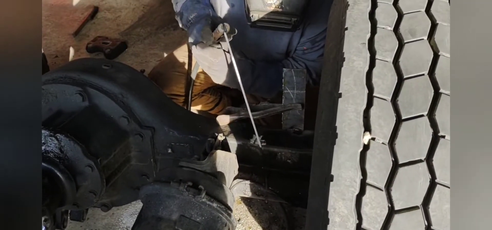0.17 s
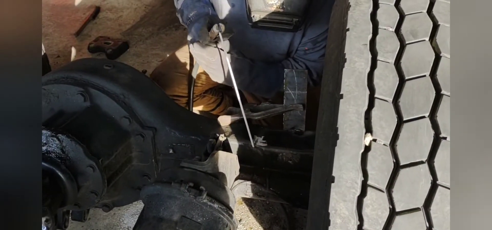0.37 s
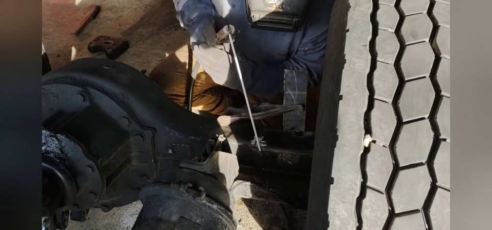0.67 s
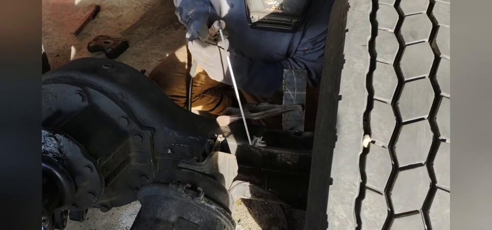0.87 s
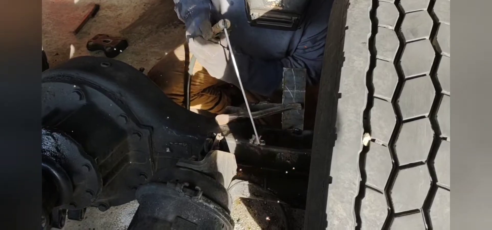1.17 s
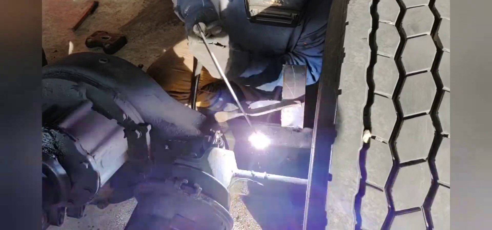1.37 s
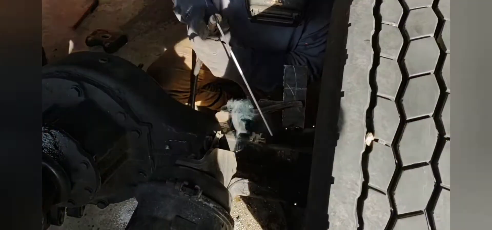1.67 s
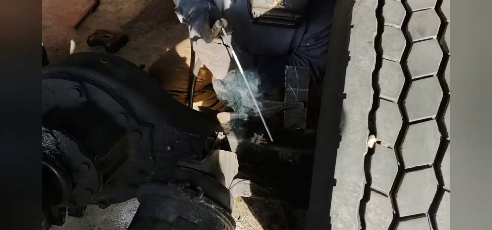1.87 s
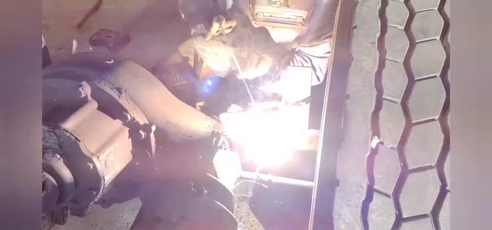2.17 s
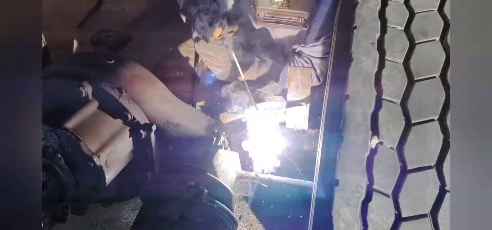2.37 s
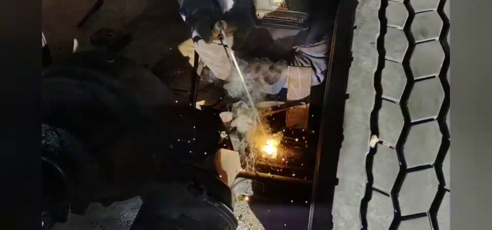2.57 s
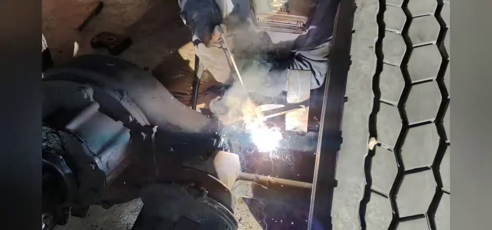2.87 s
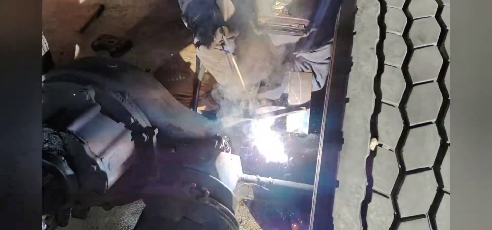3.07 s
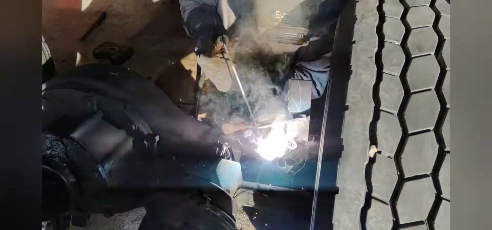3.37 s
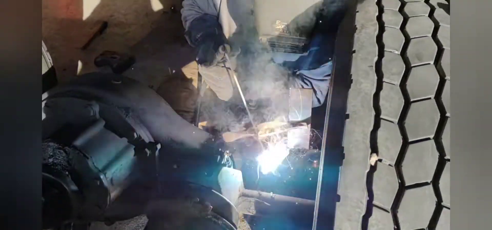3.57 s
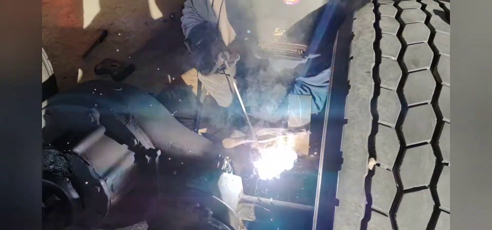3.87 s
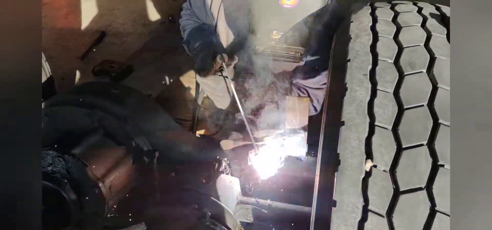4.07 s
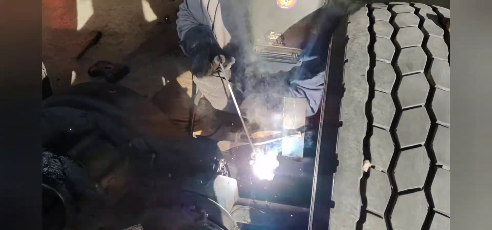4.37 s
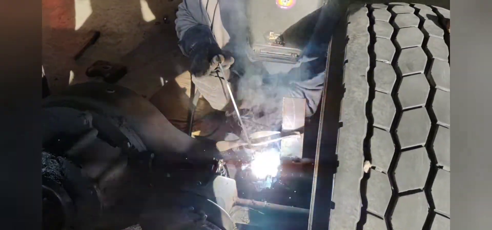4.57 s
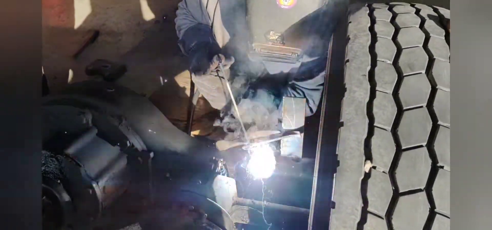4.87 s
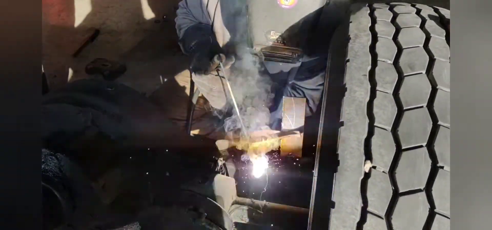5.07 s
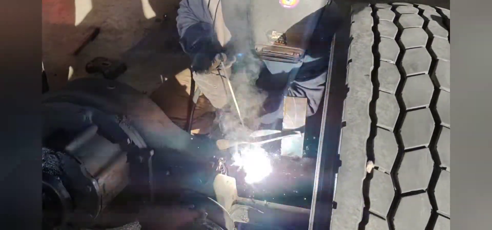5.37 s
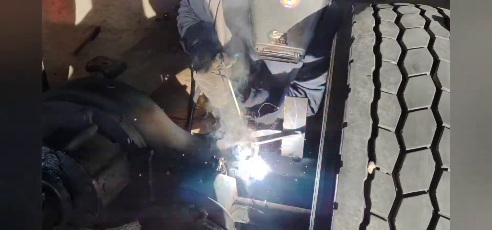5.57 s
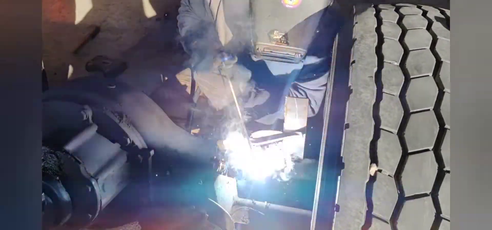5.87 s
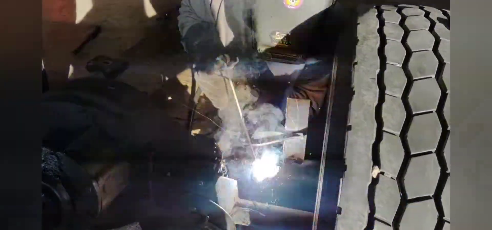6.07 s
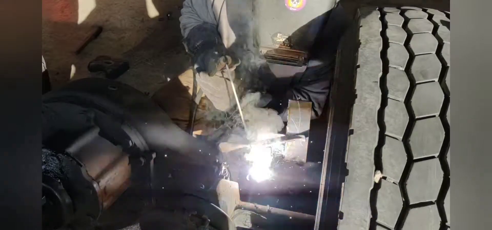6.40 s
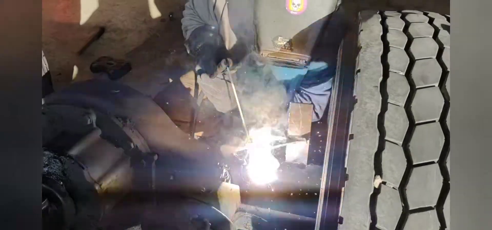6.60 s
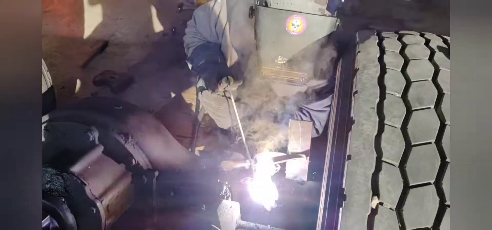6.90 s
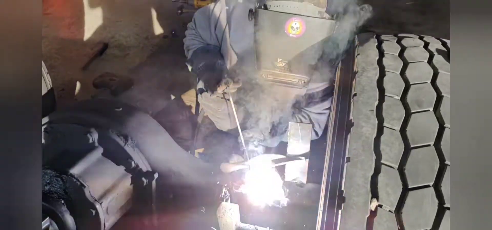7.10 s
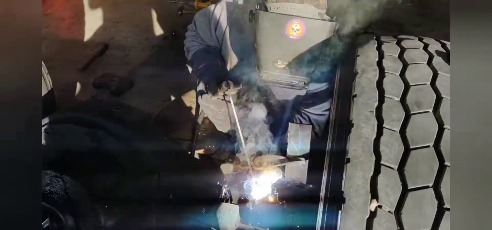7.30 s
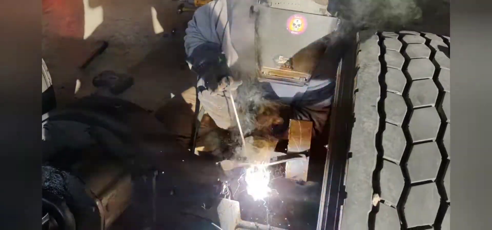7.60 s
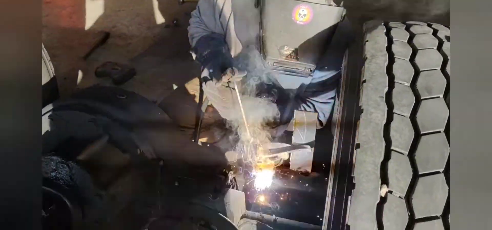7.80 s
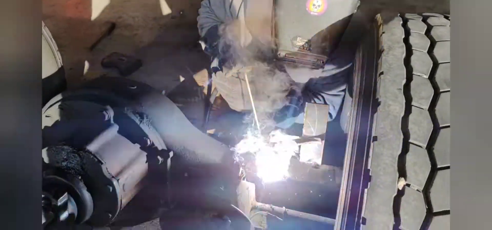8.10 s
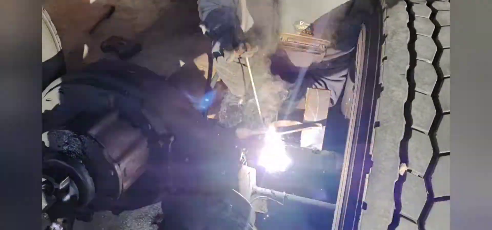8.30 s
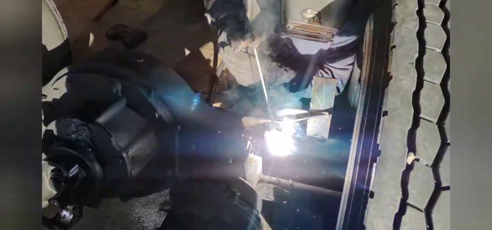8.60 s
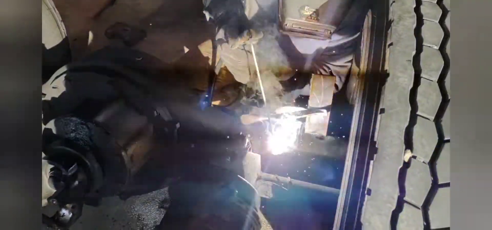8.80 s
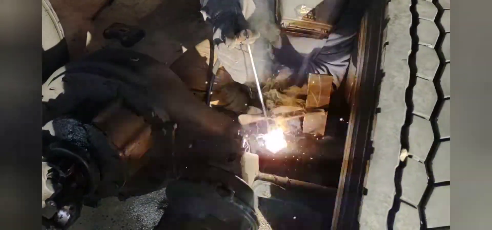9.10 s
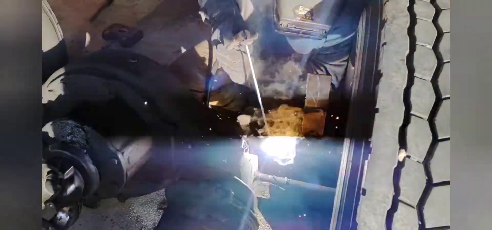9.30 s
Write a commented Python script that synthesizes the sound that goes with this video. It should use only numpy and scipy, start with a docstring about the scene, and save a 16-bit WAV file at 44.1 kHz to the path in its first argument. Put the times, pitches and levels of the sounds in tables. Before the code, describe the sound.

An arc welder strikes, then sizzles and pops on thick steel while a diesel engine booms at idle and knocks under load.

```python
"""Stick welding beside a diesel set

A stick electrode strikes twice, then burns on thick steel: the plasma hisses and spits,
and droplets pop as they short the arc. The four-cylinder diesel welding set booms at idle,
then sags and knocks under load. Each loud pop ducks a peak limiter for a tenth of a second."""
import sys
import numpy as np
from scipy import signal
from scipy.fft import rfft, irfft, next_fast_len
from scipy.io import wavfile
from scipy.ndimage import uniform_filter1d, minimum_filter1d

SR = 44100
rng = np.random.default_rng(int(sys.argv[2]) if len(sys.argv) > 2 else 0)


def persist_wave(psi):
    """Save psi, clipped to +-1, as 16-bit WAV."""
    counts = np.round(np.clip(psi, -1, 1) * 32767).astype(np.int16)
    wavfile.write(sys.argv[1], SR, np.atleast_2d(counts).T)


N = 416744
FFT_SIZE = next_fast_len(N)


# Fader rides for the burn: (time [s], sizzle level [dB], thin top level [dB])
ARC_LEVELS = [(1.98, -57, -66), (2.02, -24, -17), (2.32, -34, -50), (2.47, -26.5, -24), (2.65, -30, -25),
              (3.1, -23, -27), (3.9, -27, -31), (4.2, -27, -31), (4.75, -30, -35), (5.25, -27.5, -31),
              (5.6, -28.5, -28), (6.05, -23.5, -29), (6.4, -26.5, -35), (6.85, -25.5, -18), (7.3, -26, -25),
              (7.75, -30, -31), (8.5, -22, -33), (9.0, -26, -46), (9.45, -26.5, -33)]
# Tone of the sizzle and of its thin top: (frequency [Hz], relative level [dB])
SIZZLE_EQ = [(3000, -4.5), (4000, 0.5), (6000, 2), (7600, 2.5), (8700, 2), (9400, -3.5), (10500, -4),
             (12000, -8), (16000, -6.5)]
TOP_EQ = [(6000, -43), (10000, -16), (11500, -21), (13500, 8.5), (14300, -8), (15600, 12.5)]
# Stereo placement: (frequency [Hz], left over right [dB])
ARC_PAN = [(4000, 1.5), (8000, 4), (11000, 7.5), (15000, 2.5)]

def arc():
    """Flickering plasma hiss, fine spatter and pops, bouncing off the steel."""
    t = np.arange(9000) / SR
    flicker = amp(2.37 * unit_rms(uniform_filter1d(rng.standard_normal(N), 300)))
    spits = amp(5.7 * np.minimum(rng.exponential(1, N), 4)) * (rng.random(N) < 150 / SR)  # 150 a second
    spatter = signal.oaconvolve(spits, burst(t[:400], 0.00023, 0.00025))[:N]
    hiss = unit_rms(unit_rms(flicker) + 0.28 * unit_rms(spatter))
    noise, direct = noise_pair(0.5), 0
    for column, eq, sway_db, pop_db, fall_s in [(1, SIZZLE_EQ, 1, 5, .0014), (2, TOP_EQ, 3, 8, .0007)]:
        burn = amp(curve(ARC_LEVELS, column) + sway_db * wander(7)) * hiss
        tail = amp(-16.5) * np.exp(-t / 0.012)  # steel and ground ring out
        cracks = amp(pop_db) * pops(column, burst(t, 0.0003, fall_s) + tail)
        eq_db = spectrum(eq)
        direct += colour(noise * (burn + cracks), eq_db, ARC_PAN) / rms(amp(eq_db))
    bounce = 0.26 * np.array([np.roll(direct[0], 38), np.roll(direct[1], 51)])
    snap = np.sin(2 * np.pi * 19800 * t[:45]) * np.hanning(45)  # ultrasonic, kicks the limiter
    return direct + bounce + pops(3, snap) * amp([[0], [-2.5]])


# Pop cues: (time [s], relative crack level [dB], relative top level [dB], left snap peak [dB])
POPS = [(1.144, -23, -15, -1), (1.454, -21.5, -11.5, -6), (1.993, -16.5, -21, 4), (1.999, -15, -22, -2),
        (2.064, -23, -14, 3.5), (2.109, -14, -13, 8.5), (2.44, -23, -15, 3.5), (2.592, -21, -18, 6),
        (2.603, -22, -18, 0), (2.666, -10.5, -12, 7), (2.739, -13, -28, 5), (2.856, -28, -12, 5),
        (2.908, -11, -15, 6.5), (3.068, -13, -20, 9), (3.298, -30, -35, 2), (3.412, -35, -33, 5),
        (3.445, -22, -22, 0), (3.49, -12, -17, 2), (3.649, -13, -7.5, -0.5), (3.664, -19, -9, 0.5),
        (3.753, -12, -17, 7.5), (3.78, -9, -18, -8), (4.03, -17, -23, 8.5), (4.144, -16.5, -15, 8.5),
        (4.418, -14.5, -28, 7), (4.643, -19, -14, 4.5), (4.771, -21, -19, 1.5), (4.802, -10.5, -11, 4),
        (5.067, -16, -23, 7.5), (5.18, -17, -9.5, 1.5), (5.22, -23, -19, 3), (5.287, -9.5, -7, 3),
        (5.353, -21, -16, -0.5), (5.634, -20, -29, -4.5), (5.706, -20, -12, -8), (5.737, -22, -7, -5),
        (5.766, -11, -13.5, 4.5), (6.034, -28, -12.5, -1.5), (6.148, -13, -11, 3.5), (6.244, -18, -25, 2),
        (6.296, -16, -17, 1.3), (6.395, -18, -5.5, -5), (6.49, -12, -11, 2), (6.5, -10.5, -18, -8),
        (6.597, -30, -29, -7), (6.617, -12, -26, 6), (6.765, -18, -17, -8), (6.769, -19, -23, -5),
        (6.859, -17, -12, 3.5), (6.875, -15, -13, -2), (6.909, -9.5, -20, -1), (7.248, -23, -19, -2),
        (7.264, -14, -7, 6.5), (7.387, -29, -9.5, -19), (7.412, -17, -12, -8), (7.634, -20, -14.5, -10),
        (7.739, -16, -26, -7), (7.939, -37, -7.5, -18), (7.96, -9.5, -29, -17), (8.053, -16, -24, -6),
        (8.223, -14.5, -21, 3.5), (8.3, -17, -17, -1), (8.334, -10.5, -9, 6.5), (8.367, -28, -23, -5),
        (8.428, -16, -24, -7), (8.76, -18, -35, 3), (9.079, -15, -35, -10), (9.124, -27, -23, -3.5),
        (9.17, -26, -18, 3.5), (9.216, -13.5, -29, -4), (9.367, -24, -29, -3), (9.383, -12, -18, 4.5)]

def pops(column, shape):
    """Droplets short the arc: one copy of shape on each cue, sized by a level column."""
    cues, clicks = np.array(POPS), np.zeros(N)
    clicks[(cues[:, 0] * SR).astype(int)] = amp(cues[:, column])
    return signal.oaconvolve(clicks, shape)[:N]


# The engine's sag: (time [s], firing rate [Hz])
FIRING_RATE = [(0.0, 57.183), (0.3, 56.678), (1.0, 56.654), (1.2, 56.485), (1.4, 54.724), (1.6, 54.786),
               (2.0, 56.492), (2.2, 54.43), (2.65, 52.906), (3.1, 53.537), (3.8, 53.547), (4.2, 53.817),
               (5.0, 53.609), (5.8, 53.724), (7.4, 53.57), (8.2, 53.872), (9.45, 53.733)]
# Engine fader and effort: (time [s], roar level [dB], load [1 = full])
ENGINE_RIDE = [(0, -21.5, 0), (.5, -23.5, 0.08), (1, -27, 0.22), (1.4, -27.5, 0.17), (1.6, -27, 0.56),
               (1.72, -26.5, 0.65), (1.85, -28.5, 0.56), (2.3, -27, 0.73), (2.6, -29.5, 0.91),
               (3, -23.5, 1.05), (3.5, -23, 0.98), (4, -27, 0.99), (5, -26.5, 0.94), (6, -25, 0.82),
               (7, -24.5, .75), (8, -26, 0.95), (8.5, -23.5, 0.96), (9.45, -27, 1)]
# Placement of knock and roar: (frequency [Hz], left over right [dB])
ENGINE_PAN = [(100, -3), (400, 5.5), (900, -1.5), (2000, -3), (4400, -0.5), (8000, -8)]

def engine():
    """The diesel: exhaust, knock, valves and roar, all locked to the firings."""
    rate = curve(FIRING_RATE)
    firings = np.cumsum(rate) / SR
    gain, load = amp(curve(ENGINE_RIDE)), curve(ENGINE_RIDE, column=2)
    tones = exhaust(firings)
    block = colour(gain * knock(firings, rate, load), 0, ENGINE_PAN)
    pipe = gain * (tones + valves(firings, rate) + roar(firings))
    right = np.roll(block[1], 23) + np.roll(pipe[1], 17)  # both arrive later on the right
    return np.array([block[0] + pipe[0], right])


# The boom fades as the arc takes hold: (time [s], level over the roar [dB])
BOOM_LEVEL = [(.15, 7.5), (.5, 11), (1, 13), (1.95, 11.5), (2.3, 6), (2.6, 2), (9.45, 1)]
# Tones around the boom: (pitch [x firing rate], level over the roar [dB])
EXHAUST_TONES = [(1, -20.5), (3, -9.5), (4, -17.5), (4.75, -16), (5, -12.5), (6, -24.5), (8.75, -17),
                 (10, -35), (11.5, -14)]

def exhaust(firings):
    """A boom at twice the firing rate, among weaker wavering tones."""
    crank = firings + 0.075 + 0.018 * np.sin(np.pi * firings / 2)  # uneven through the cycle
    tones = amp(curve(BOOM_LEVEL)) * np.cos(4 * np.pi * crank)
    for multiple, db in EXHAUST_TONES:
        gain = amp(db + 2.6 * wander(25))
        phase = multiple * firings + rng.random() + 0.085 * wander(25)
        tones += gain * np.cos(2 * np.pi * phase)
    return np.sqrt(2) * tones


# Block ring in low, middle and high groups:
# (frequency [Hz], nominal width [Hz], relative level for each of four cylinders [dB])
BLOCK_MODES = [
    [(1066, 164, 3.5, 3, 7.5, -0.5), (1297, 280, -23, -9.5, -6, 3.5), (1510, 94, 7.5, 3.5, 7.5, 9)],
    [(1733, 17, -2, 11, -34, -18), (1835, 238, 7, 5, 4.5, 9.5), (2226, 79, 3.5, 3, 4.5, 7.5),
     (2310, 235, 6, 6, 1, 5)],
    [(2947, 120, -7.5, -8, -6.5, -5.5), (3570, 120, -4, -10, -8.5, -9), (4210, 260, -11.5, -11.5, -13, -14),
     (8300, 850, -27.5, -25, -33, -28), (14800, 2700, -34, -34, -37, -34)],
]
# Thin panels around the engine: (frequency [Hz], nominal width [Hz], relative level [dB])
PANEL_MODES = [(4743, 290, 7.5), (5093, 120, 4), (5460, 310, -4.5)]
# Fader for the low group: (time [s], level over the roar [dB])
LOW_KNOCK = [(0, -5.5), (1, -3), (1.4, 0.5), (3, 3.5), (5, -8.5), (7, -2.5), (8.5, 4), (9.45, 2)]
# Bite of the middle group, high group and panels: (idle level over the roar [dB],
# boost at full load [dB], fade as the knock grows duller toward the end [dB/s])
KNOCK_BITE = [(-5, 15.5, 1.24), (-16.5, 20.5, 2.5), (-10.5, 12, 8)]
KNOCK_DULLS_S = 6.4

def knock(firings, rate, load):
    """Each combustion rings the block and shakes the panels, with more bite under load."""
    burns = firings + .5  # combustion starts half-way between whole counts
    count, since = burns.astype(int), burns % 1 / rate
    strength = amp(.6 * per_firing(count))
    step = np.roll(np.diff(count, prepend=count[0]) * strength, 70)  # pressure jump early in the burn
    rebound = 0.42 * np.roll(step, 75)
    rattle = noise_pair(0.8) * (strength * burst(since, 0.0034, 0.001) + 0.07)  # never quite rests
    drive = rattle + 1.53 * (step - rebound)
    dulling_s = np.maximum(np.arange(N) / SR - KNOCK_DULLS_S, 0)
    mid_db, high_db, panel_db = (idle + boost * load - fade * dulling_s
                                 for idle, boost, fade in KNOCK_BITE)
    block = 0
    for group_db, modes in zip((curve(LOW_KNOCK), mid_db, high_db), BLOCK_MODES):
        group = 0
        for hz, width, *cylinder_db in modes:
            chance_db = 1.65 * per_firing(count) + 2.06 * wander(6)  # now this mode, now that
            hit_db = np.array(cylinder_db)[(count - 1) % 4] + chance_db
            group += ring(drive * amp(hit_db), hz, 1.28 * width)
        block += amp(group_db) * unit_rms(group)
    panels = sum(ring(drive * amp(db + 3.5 * wander(4.5)), hz, width) for hz, width, db in PANEL_MODES)
    return block + amp(panel_db) * unit_rms(panels)


# Valve rhythm: (place in the four-firing cycle [0-1], relative level [dB])
VALVE_HITS = [(.33, 28), (1, -32), (.16, -12.5), (.86, -27.5)]

def valves(firings, rate):
    """Dull valve thumps: noise bursts through one low resonance."""
    hits = sum(amp(db) * burst((firings / 4 - place) % 1 * 4 / rate, 0.0024, 0.0056)
               for place, db in VALVE_HITS)
    return amp(-13.5) * unit_rms(ring(noise_pair(0.73) * hits, hz=574, width=190))


# Tone of the roar: (frequency [Hz], relative level [dB])
ROAR_EQ = [(20, -30), (38, -26), (50, -3), (75, -4), (250, -4.5), (620, -2), (760, -7.5), (1300, -4),
           (2300, -8), (2700, -19), (3900, -12), (5200, -27.5), (6000, -49), (8000, -61), (16000, -60)]
# Its stereo focus: (frequency [Hz], left-right likeness [0-1])
ROAR_LIKENESS = [(60, 0.14), (300, 1), (700, 0.56), (2500, 0.95), (5000, 0.43), (9000, 0.11)]

def roar(firings):
    """Fan, intake and casing noise that throbs with each firing."""
    throb = 1 + 0.11 * np.cos(2 * np.pi * (firings + .33))
    noise = noise_pair(spectrum(ROAR_LIKENESS))
    return unit_rms(colour(noise * throb, spectrum(ROAR_EQ), ENGINE_PAN))


# Fader for the hiss bed: (time [s], level [dB])
BED_LEVEL = [(0, -41.5), (.4, -41.5), (.8, -45.5), (1.1, -53), (1.4, -54), (1.55, -39.5), (2, -40)]
# Its tone: (frequency [Hz], relative level [dB])
BED_EQ = [(4000, -24), (6000, 9), (9000, 3), (11000, -14), (13500, 0), (16000, -5)]

def hiss_bed():
    """A faint treble hiss that sinks away at idle and returns as the arc strikes."""
    return amp(curve(BED_LEVEL)) * unit_rms(colour(noise_pair(0.22), spectrum(BED_EQ), ARC_PAN))


def amp(db):
    """Decibels to gain."""
    return 10 ** (np.asarray(db) / 20)


def rms(x):
    """Root mean square, never zero."""
    return np.sqrt(np.mean(x ** 2) + 1e-20)


def unit_rms(x):
    """Scales to rms 1."""
    return x / rms(x)


def curve(table, column=1):
    """One column of a time table at every sample."""
    rows = np.array(table)
    return np.interp(np.arange(N) / SR, rows[:, 0], rows[:, column])


def spectrum(table):
    """A frequency table at every FFT bin."""
    hz, value = np.transpose(table)
    return np.interp(np.log(np.fft.rfftfreq(FFT_SIZE, 1 / SR) + 1), np.log(hz), value)


def colour(x, eq_db, pan):
    """EQs a stereo pair and pans it by frequency."""
    gain = amp(eq_db + np.outer([.5, -.5], spectrum(pan)))
    return irfft(rfft(x, FFT_SIZE) * gain, FFT_SIZE)[:, :N]


def noise_pair(likeness):
    """Stereo white noise, from wide (0) to mono (1)."""
    left, other = rfft(rng.standard_normal((2, FFT_SIZE)))
    right = likeness * left + np.sqrt(1 - likeness ** 2) * other
    return irfft(np.array([left, right]), FFT_SIZE)[:, :N]


def ring(x, hz, width):
    """Two-pole resonance of peak gain 1, applied twice for dark valleys."""
    b, a = signal.iirpeak(hz, hz / width, SR)
    return signal.lfilter(b, a, signal.lfilter(b, a, x))


def burst(since, rise_s, fall_s):
    """Attack and decay by seconds since a hit."""
    return (1 - np.exp(-since / rise_s)) * np.exp(-since / fall_s)


def per_firing(count):
    """One random value held through each firing."""
    return rng.standard_normal(count[-1] + 1)[count]


def wander(per_s):
    """Smooth random drift, rms about 1."""
    points = rng.standard_normal(int(N / SR * per_s) + 2)
    return np.interp(np.arange(N) * per_s / SR, np.arange(len(points)), points)


def scene():
    """Hiss bed and engine, with the arc on top."""
    return hiss_bed() + engine() + arc()


def record(dry):
    """Peak limiter on each channel (100 ms hold), then a low-pass that removes the ultrasonic snaps."""
    gain = 1 / np.maximum(abs(dry), 1)
    held = minimum_filter1d(gain, 4400, origin=2199, mode="nearest")
    pole = np.exp(-1 / (0.0014 * SR))  # quick fall and recovery
    duck = 1 + signal.lfilter([1 - pole], [1, -pole], held - 1)
    lowpass = signal.firwin(1023, 15900, window=("kaiser", 9), fs=SR)
    return signal.oaconvolve(dry * duck, lowpass[None], "same")


dry = scene()
out = record(dry)
persist_wave(out)
```